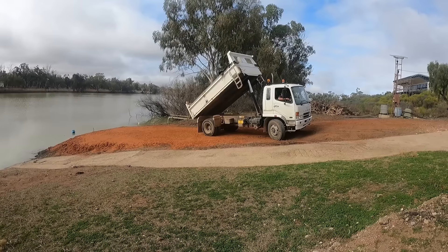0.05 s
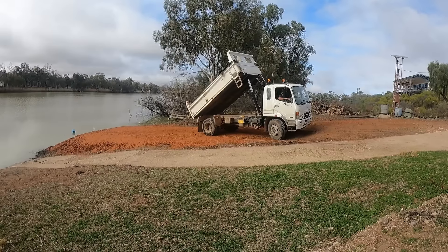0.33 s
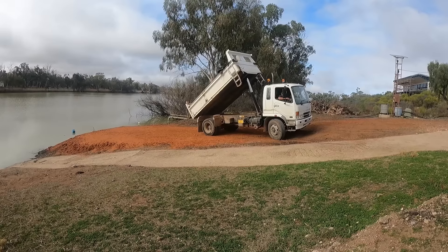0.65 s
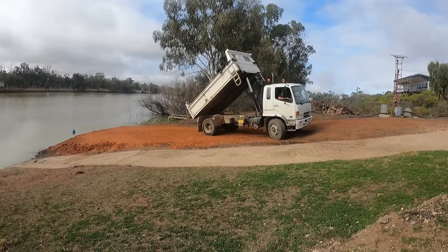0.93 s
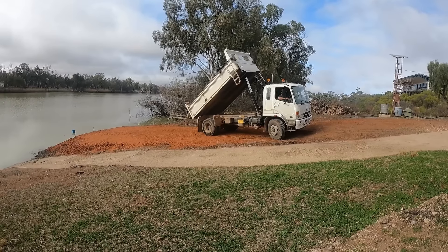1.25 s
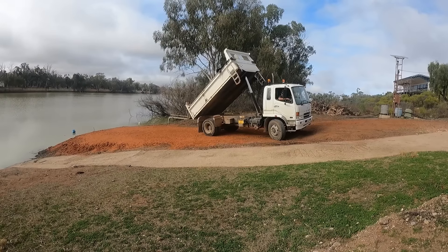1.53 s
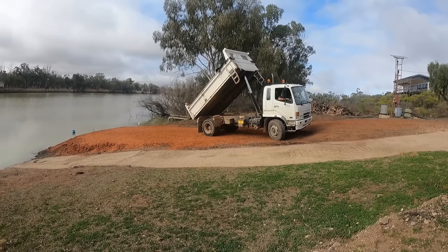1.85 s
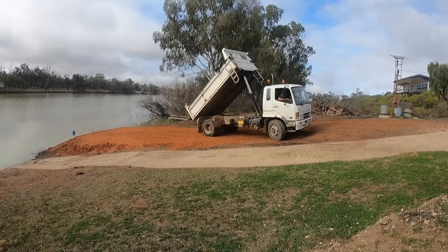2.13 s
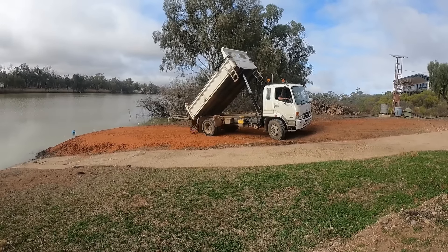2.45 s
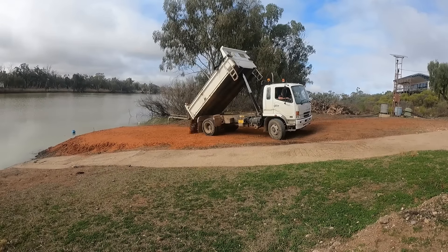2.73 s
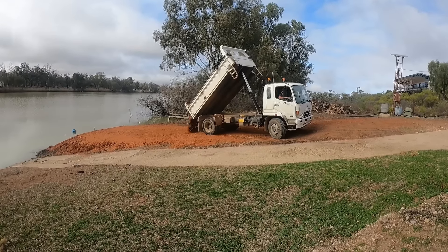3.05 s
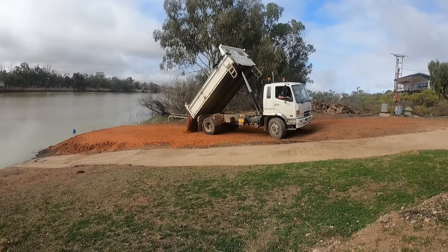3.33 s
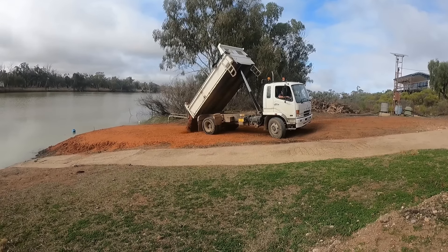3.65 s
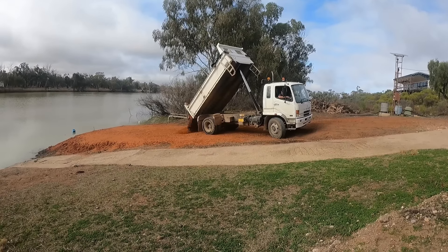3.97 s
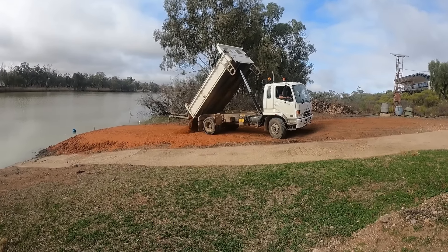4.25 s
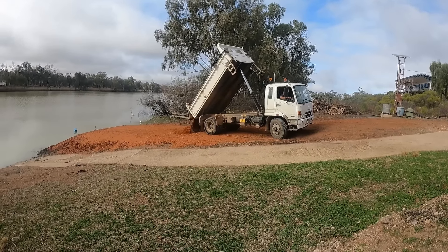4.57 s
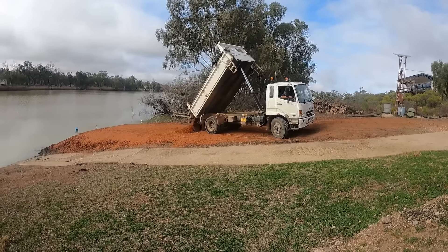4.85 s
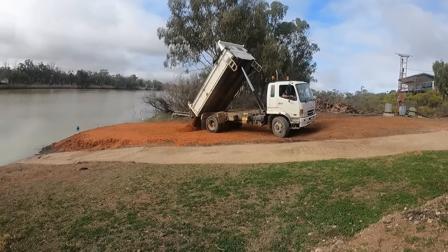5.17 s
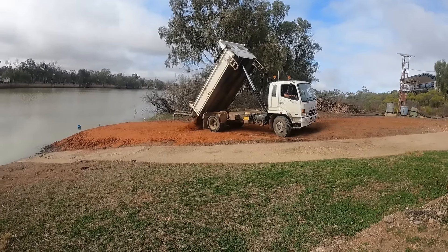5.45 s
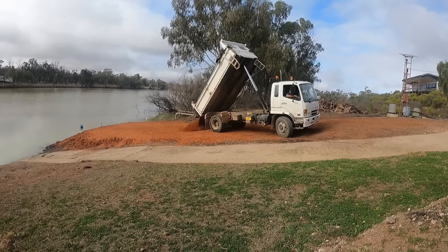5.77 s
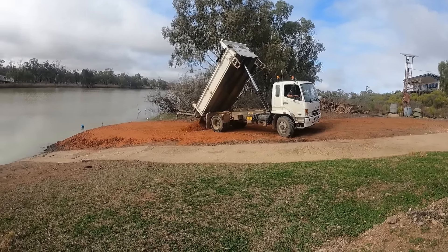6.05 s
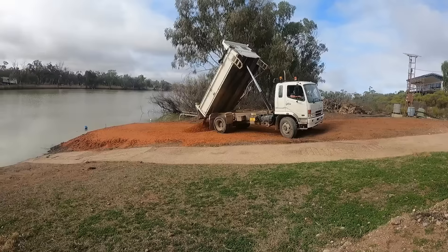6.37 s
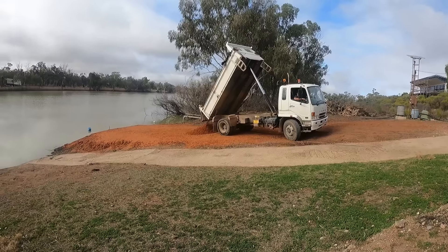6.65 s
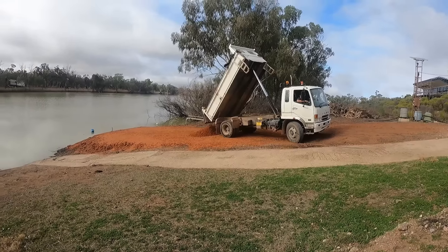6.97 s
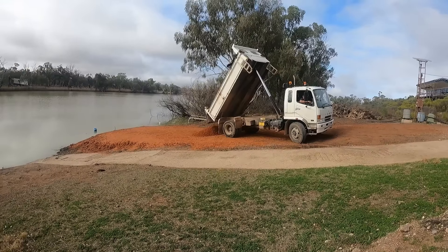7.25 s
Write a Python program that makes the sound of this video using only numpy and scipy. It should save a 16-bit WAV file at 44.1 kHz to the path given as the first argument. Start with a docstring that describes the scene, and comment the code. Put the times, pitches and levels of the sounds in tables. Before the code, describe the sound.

A tipper truck's diesel engine drones and clatters steadily in the open air, a little way from the microphone. After a dull metal thud, the hoist hums and whines while dirt trickles, then rushes to the ground. Near the end comes another thud, the whine runs down and oil hisses through a valve as the engine dips and recovers. Faint chirps and a low breeze sit behind it.

```python
"""Some way off, a six-cylinder diesel tipper runs at fast idle on a river bank; wind nudges the
microphone and a bird chirps now and then. The steel tray thuds as the hoist starts to lift it, the oil
pump hums and the gears build to a whine. Midway, dirt slides out and rumbles onto a heap. Near the top
the tray thuds again, the engine sags, the gears run down and oil hisses through a valve that snaps open.
Then the engine picks up speed again."""
import sys
import numpy as np
from scipy import signal
from scipy.fft import rfft, irfft
from scipy.io import wavfile

SR = 44100
rng = np.random.default_rng(int(sys.argv[2]) if len(sys.argv) > 2 else 0)


def wav_record(signal):
    """Record a signal, one row per channel, as 16-bit PCM in the file named by sys.argv[1]."""
    frames = np.transpose(np.atleast_2d(signal))
    bounded = np.clip(frames, -1, 1)
    # unit amplitude maps onto the largest positive 16-bit level
    quanta = np.round(bounded * 32767).astype(np.int16)
    wavfile.write(sys.argv[1], SR, quanta)


N = 330926
T = np.arange(N) / SR
FREQS = np.arange(N // 2 + 1) * SR / N
# Moments in the lift: the hoist takes the weight, the load is lightest, the gears let go, the valve opens.
BITE_S, LIGHTEST_S, RELEASE_S, OPEN_S = .4, 4.4, 6.6, 6.74


def undb(db):
    """Turns decibels into a gain."""
    return 10 ** (np.asarray(db) / 20)


def colour(table, hz):
    """Gain at these frequencies, read from rows of frequency and dB."""
    points_hz, db = np.transpose(table)
    return undb(np.interp(np.log(hz + 1e-6), np.log(points_hz), db))


def shaped(x, table):
    """Filters a sound by a table of levels, fading out the treble above its last row."""
    roll_off = 1 / np.sqrt(1 + (FREQS / (1.3 * table[-1][0])) ** 8)
    return irfft(rfft(x) * colour(table, FREQS) * roll_off, N) * np.sqrt(SR / 2)


def unit(x):
    """Scales a signal to an average strength (rms) of 1."""
    return x / np.sqrt(np.mean(x ** 2))


def noise():
    """White noise, an even hiss."""
    return rng.standard_normal(N)


def wander(hz):
    """A smooth random wobble, mostly slower than hz."""
    return unit(irfft(rfft(noise()) / (1 + (FREQS / hz) ** 4), N))


def tone(turns):
    """A pure tone, one wave per turn, starting at a random point in the wave."""
    return np.sqrt(2) * np.sin(2 * np.pi * (turns + rng.random()))


def ramp(start_s, length_s):
    """A smooth step from 0 to 1."""
    along = np.clip((T - start_s) / length_s, 0, 1)
    return (1 - np.cos(np.pi * along)) / 2


def swell(centre_s, half_width_s):
    """A bell-shaped rise to 1 and fall."""
    return np.exp(-((T - centre_s) / half_width_s) ** 2)


def fade(start_s, db_per_s):
    """Holds at 1, then dies away steadily."""
    return undb(-db_per_s * np.maximum(T - start_s, 0))


# Wind on the microphone. Each row: frequency in Hz, level in dB.
WIND_SPECTRUM = [(1, -53), (3, -40), (8, -46), (15, -51), (25, -73), (45, -74), (80, -89), (150, -87),
                 (500, -125)]

def wind(start_db=-3.5, db_per_s=.66):
    """A breeze rises with a deep flutter, then grows steadily."""
    return shaped(noise(), WIND_SPECTRUM) * undb(start_db + db_per_s * T) * ramp(0, .25)


# The bird's calls. Each row: start in seconds, level in dB.
BIRD_CHIRPS = [(.432, -55), (2.12, -63), (6.497, -65), (7.45, -58)]

def bird(start_hz=4900, rise_hz=1100, length_s=.0245):
    """Short upward chirps from the trees."""
    chirps = 0
    for start_s, db in BIRD_CHIRPS:
        along = np.clip((T - start_s) / length_s, 0, 1)
        turns = np.cumsum(start_hz + rise_hz * along) / SR
        chirps += undb(db) * np.sin(np.pi * along) * tone(turns)
    return chirps


# Dirt sliding on steel, and dirt landing on the heap. Each row: frequency in Hz, level in dB.
SLIDE_SPECTRUM = [(60, -86), (130, -82.5), (280, -68), (500, -82.5), (1000, -87), (2500, -84.5),
                  (3700, -85), (5000, -100), (8000, -110), (15000, -124)]
HEAP_SPECTRUM = [(60, -82), (150, -83.5), (260, -68), (390, -67.5), (520, -87), (1000, -105)]

def dirt(grains_per_s=9000, trickle_db=-11, rush_db=-4.5, rush_s=3.41, fall_s=.41):
    """Crumbs trickle off the steel floor; one long rush lands on the heap a moment later."""
    grains = (rng.random(N) < grains_per_s / SR) * noise()
    pour = undb(trickle_db) + undb(rush_db) * swell(rush_s, .82)
    landing = swell(rush_s + fall_s, .35) * undb(2 * wander(12))
    slide = shaped(unit(grains), SLIDE_SPECTRUM) * pour * undb(wander(4.7))
    return slide + shaped(noise(), HEAP_SPECTRUM) * landing


# The tray's thuds. Each row: start in seconds, crash level in dB, crash decay in seconds,
# boom pitch in Hz, boom level in dB.
TRAY_THUDS = [(0.39, -0.5, 0.049, 436, -32.5), (.403, -10, 0.067, 369, -32), (6.465, 5, 0.035, 448, -42),
              (6.498, -5, 0.049, 304, -31.5), (6.525, -13, 0.07, 219, -34)]
# The dull crash of steel. Each row: frequency in Hz, level in dB.
CRASH_SPECTRUM = [(40, -61), (120, -74), (220, -64.5), (330, -56), (450, -63.5), (650, -66), (800, -71),
                  (1000, -67.5), (1500, -79), (3000, -82.5), (6000, -115)]

def tray(attack_s=.0042, boom_decay_s=.027):
    """The tray shifts on the ram that lifts it: a dull crash, and a panel booms briefly."""
    blows, boom = 0, 0
    for start_s, crash_db, decay_s, boom_hz, boom_db in TRAY_THUDS:
        age = np.maximum(T - start_s, 0)
        onset = 1 - np.exp(-age / attack_s)
        blows += undb(crash_db) * onset * np.exp(-age / decay_s)
        boom += undb(boom_db) * onset * np.exp(-age / boom_decay_s) * tone(boom_hz * age)
    return shaped(noise() * blows, CRASH_SPECTRUM) + boom


def valve_flow(leak_s=6.45, leak_db=-17.5, snap_s=.056):
    """A little oil leaks through, then the valve snaps open and the pressure drains."""
    leak = undb(leak_db) * ramp(leak_s, .092)
    return leak + ramp(OPEN_S, snap_s) * fade(OPEN_S + snap_s, db_per_s=13)


# The hiss of the oil jet. Each row: frequency in Hz, level in dB.
JET_SPECTRUM = [(40, -80), (80, -76), (130, -74.5), (240, -66.5), (330, -62.5), (480, -72.5), (580, -81),
                (690, -71), (850, -77.5), (1300, -74), (2100, -77.5), (2500, -84), (3400, -76.5),
                (4700, -95.5), (5800, -98), (7000, -99), (12500, -108), (15500, -117)]
# The valve's whistles. Each row: pitch in Hz, width in Hz, level in dB.
VALVE_WHISTLES = [(2876, 56, -70), (3644, 31, -65), (4370, 50, -84), (5620, 80, -88), (5780, 57, -84),
                  (10500, 99, -99)]

def valve(flow, squeal_db=3):
    """Oil jets through the relief valve and makes it whistle, hardest just after it opens."""
    ringing = 0
    for hz, width_hz, db in VALVE_WHISTLES:
        off_pitch = (FREQS - hz) / width_hz
        ringing += undb(db) / (1 + 2j * off_pitch) / (1 + (off_pitch / 6) ** 2)
    whistle = irfft(rfft(noise()) * ringing, N) * np.sqrt(SR / 2)
    squeal = undb(squeal_db * swell(OPEN_S + .16, .085))
    hiss = shaped(noise(), JET_SPECTRUM)
    return (hiss + whistle * squeal) * flow * undb(wander(30))


def pump(drive, pulses_per_cycle=13.45, idle_db=-45.5, full_db=-42, pipe_hz=164, pipe_width_hz=3.25):
    """Oil pulses hum as the hoist takes the weight; later the slowing pump briefly makes a pipe ring."""
    hz = pulses_per_cycle * drive
    turns = np.cumsum(hz) / SR
    pressure = undb(idle_db + (full_db - idle_db) * ramp(BITE_S, .064))
    pressure *= fade(BITE_S + .25, db_per_s=9.5)  # eases as the tray steepens
    pipe = undb(-41.5) / abs(1 + 2j * (hz - pipe_hz) / pipe_width_hz)
    overtone = undb(-63) * tone(3 * turns)
    hum = (pressure + pipe) * tone(turns) + overtone
    return hum * undb(.9 * wander(12))


def drive_speed(speed, slowing_per_s=5.0):
    """The hoist's drive follows the engine until it is let go, then friction slows it evenly."""
    coasting = np.interp(RELEASE_S, T, speed) - slowing_per_s * (T - RELEASE_S)
    return np.where(T < RELEASE_S, speed, coasting)


def tray_echo_gain(dip_s=4.062, beats_per_s=1.237, slowing_per_s=.089):
    """An echo off the rising tray boosts and weakens the whine in turn, ever more slowly."""
    since = T - dip_s
    lag_turns = beats_per_s * since - slowing_per_s * since ** 2 / 2
    echo = .35 + .52 * swell(4.6, .62)  # strongest while the tray faces the listener
    return abs(1 - echo * np.exp(2j * np.pi * lag_turns))


# Gear tones under load, and when running down. Each row: multiple of the drive speed, level in dB.
LOADED_GEAR_TONES = [(132, 0), (131, -23), (130, -21), (133, -25), (198, -24), (264, -38)]
COASTING_GEAR_TONES = [(106, 3), (170, -3), (262, -7)]

def gears(drive, whine_db=-43, unloaded_db=-13, build_s=1.52, ease_db=-1.5, coast_db=-52):
    """Gear teeth whine in step with the engine, then rattle loosely as they run down."""
    turns = np.cumsum(drive) / SR
    whine = sum(undb(db) * tone(round(k) * turns + .026 * wander(25)) for k, db in LOADED_GEAR_TONES)
    rattle = sum(undb(db + 3 * wander(22)) * tone(round(k) * turns + .074 * wander(40))
                 for k, db in COASTING_GEAR_TONES)
    load_db = unloaded_db * (1 - ramp(0, build_s)) + ease_db * ramp(LIGHTEST_S, RELEASE_S - LIGHTEST_S)
    loaded = undb(whine_db + load_db + .65 * wander(17)) * (1 - ramp(RELEASE_S, .23))
    loose = undb(coast_db) * ramp(RELEASE_S - .093, .093) * fade(RELEASE_S, db_per_s=8)
    return whine * loaded * tray_echo_gain() + rattle * loose


# The engine's sag and recovery. Each row: start in seconds, length in seconds, change in cycles a second.
SAG_AND_RECOVERY = [(6.46, .64, -1.16), (7.168, .46, 1.6)]

def engine_speed(free_speed=13.76, droop=.265, creep_per_s=.0105, relief=.075):
    """Engine cycles a second: the tray's weight slows it a little; at the top it sags and recovers."""
    lost = droop * ramp(BITE_S, .78) + creep_per_s * T - relief * swell(LIGHTEST_S, 1.3)
    changes = sum(change * ramp(start_s, length_s) for start_s, length_s, change in SAG_AND_RECOVERY)
    return free_speed - lost + changes


def engine_drone(turns, waves_per_cycle=26.9, start_db=-54.5, db_per_s=1.2, strain_db=-38, strain_s=6.83):
    """A wavering tone follows the engine; under strain it swells and gains a rough overtone."""
    strain = ramp(strain_s, .11)
    phase = waves_per_cycle * turns + .038 * strain * wander(26)
    calm = undb(start_db + db_per_s * T) * (1 - strain) * tone(phase)
    overtone = undb(-9) * tone(2 * phase + .11 * wander(30))
    growl = undb(strain_db) * strain * (tone(phase) + overtone)
    return (calm + growl) * undb(1.45 * wander(8.3))


# The six firings. Each row: place in the cycle from 0 to 1, exhaust thump in dB, block knock in dB.
CYLINDER_FIRINGS = [(0.099, -1.5, 3.5), (.27, -9.5, 4.5), (.44, -3.5, 10), (.55, -4.5, -4), (0.691, 7, 5),
                    (.95, -3.5, -5)]
THUMP_COLUMN, KNOCK_COLUMN = 1, 2

def firing_pulses(turns, decay_cycles, depth, column):
    """Loudness through the engine cycle: each cylinder strikes and dies away over a steady level."""
    strikes = sum(undb(row[column]) * np.exp(-((turns - row[0]) % 1) / decay_cycles)
                  for row in CYLINDER_FIRINGS)
    return unit(1 + depth * (unit(strikes) - 1))


# The engine's strongest tones. Each row: multiple of the engine speed, level in dB.
STRONG_TONES = [(6, -74.5), (9, -73.5), (12, -60.5), (16, -60.5), (18, -52.5), (22, -50.5), (23, -46.5),
                (26, -53), (33, -57), (40, -64.5), (45, -61.5), (48, -58.5), (51, -62.5), (53, -60),
                (66, -59), (68, -63), (72, -60.5), (90, -51), (99, -56), (106, -53)]
# How the exhaust and engine block ring. Each row: frequency in Hz, level in dB.
BODY_SPECTRUM = [(100, -115), (150, -80), (220, -65), (300, -58), (380, -64.5), (470, -69.5), (680, -65.5),
                 (790, -80), (900, -71), (1040, -73.5), (1170, -58), (1290, -64.5), (1380, -59),
                 (1520, -76.5), (1750, -78), (2600, -86)]

def engine_beat(turns, idle_speed, thump_decay, knock_decay, echo=.11, size=2048):
    """One cycle of low thumps and higher knocks repeats, ringing through the exhaust and block."""
    place = np.arange(size) / size
    hz = np.arange(size // 2 + 1) * idle_speed
    thumps = rfft(rng.standard_normal(size) * firing_pulses(place, thump_decay, .61, THUMP_COLUMN))
    knocks = rfft(rng.standard_normal(size) * firing_pulses(place, knock_decay, .26, KNOCK_COLUMN))
    tones = np.where(hz < 500, thumps, knocks)
    # The firings set each tone's timing; the levels are evened out, then the strong tones are set.
    gain = np.sqrt(abs(tones) / np.sqrt(size)) * (hz > 50) * (hz < 3000)
    for multiple, db in STRONG_TONES:
        k = int(round(multiple))
        gain[k] = undb(db) / colour(BODY_SPECTRUM, hz[k])
    cycle = irfft(gain * tones / abs(tones)) * size / np.sqrt(SR)
    direct = np.interp(turns, place, cycle, period=1)
    # The echo off the rising tray comes ever later, so each tone swells and fades in its own time.
    bounced = np.interp(turns - .12 - .00507 * T, place, cycle, period=1)
    return shaped(direct + echo * bounced, BODY_SPECTRUM)


# Engine noise that never repeats, low and high. Each row: frequency in Hz, level in dB.
RUMBLE_SPECTRUM = [(40, -100), (115, -97), (200, -82.5), (310, -69.5), (400, -70.5), (480, -80.5),
                   (680, -78), (800, -86), (890, -79.5), (1400, -76), (1540, -84), (1780, -74), (2100, -83),
                   (2500, -100)]
CLATTER_SPECTRUM = [(1500, -105), (2250, -82.5), (2700, -87.5), (2980, -81.5), (3250, -91.5), (3750, -84),
                    (4300, -94.5), (5000, -101), (5450, -96), (5850, -92.5), (6400, -103), (7600, -107),
                    (9200, -111.5), (10000, -115), (15500, -119)]

def engine(turns, speed, flow, thump_decay=.066, knock_decay=.045, db_per_speed=4, sag_db=-6.0):
    """The diesel's beat, weaker when it slows or the valve flows, with noise pulsing at each firing."""
    idle_speed = np.median(speed)
    beat = engine_beat(turns, idle_speed, thump_decay, knock_decay)
    effort_db = -.33 + db_per_speed * (speed - idle_speed) + sag_db * flow
    rumble = shaped(noise() * firing_pulses(turns, thump_decay, .085, THUMP_COLUMN), RUMBLE_SPECTRUM)
    clatter = shaped(noise() * firing_pulses(turns, knock_decay, .15, KNOCK_COLUMN), CLATTER_SPECTRUM)
    return beat * undb(effort_db + .46 * wander(25)) + rumble + clatter


def scene():
    """Mixes the engine, the hoist it drives, the wind and the bird into one channel."""
    flow, speed = valve_flow(), engine_speed()
    drive = drive_speed(speed)
    turns = np.cumsum(speed) / SR + .00038 * wander(4.8)  # engine cycles so far
    # Each knock is a shade early or late, more so when the valve loads the engine.
    stumble = .00026 * wander(60) + .0044 * flow * wander(18)
    motor = engine(turns + stumble, speed, flow) + engine_drone(turns)
    hoist = gears(drive) + pump(drive) + valve(flow) + dirt() + tray()
    return (motor + hoist + wind() + bird())[None]


def record(dry, top_hz=15750):
    """Cuts off the very highest treble."""
    return signal.sosfilt(signal.ellip(10, .1, 70, top_hz, fs=SR, output="sos"), dry)


dry = scene()
out = record(dry)
wav_record(out)
```